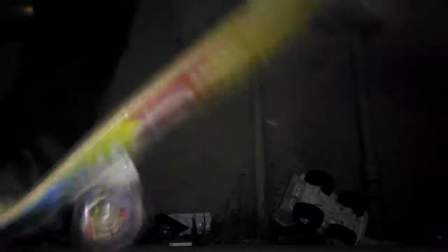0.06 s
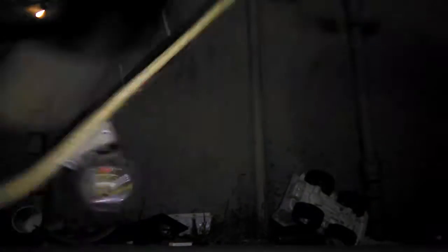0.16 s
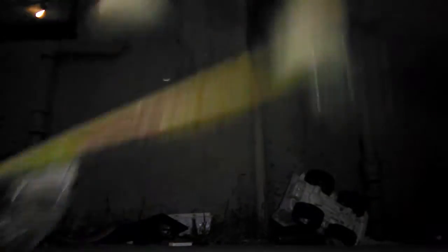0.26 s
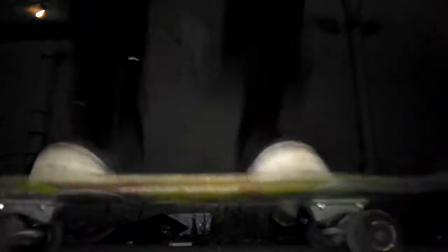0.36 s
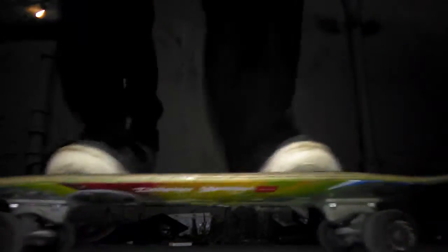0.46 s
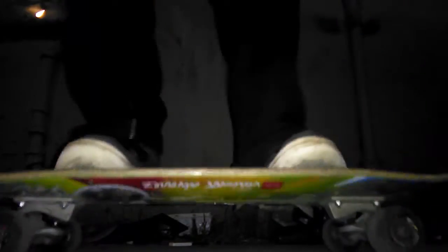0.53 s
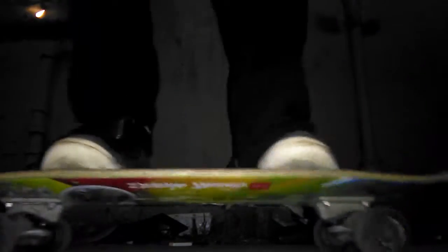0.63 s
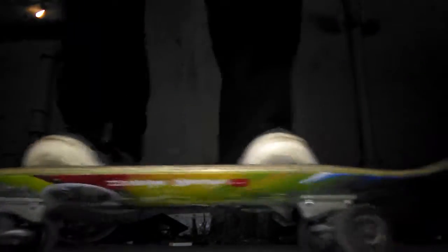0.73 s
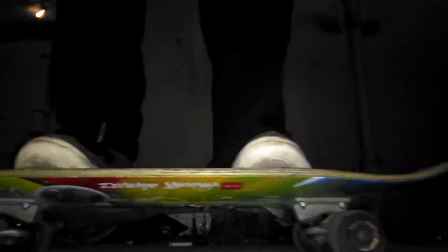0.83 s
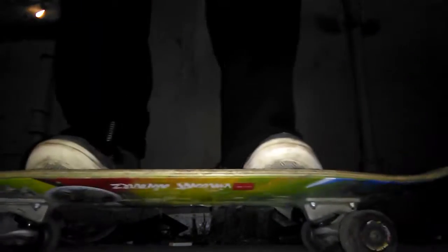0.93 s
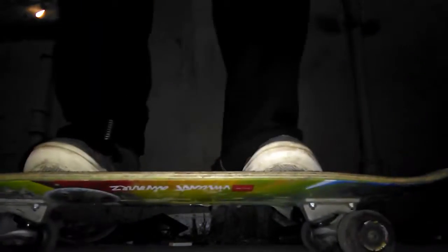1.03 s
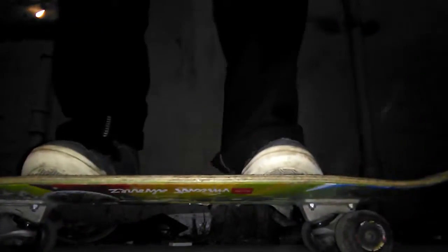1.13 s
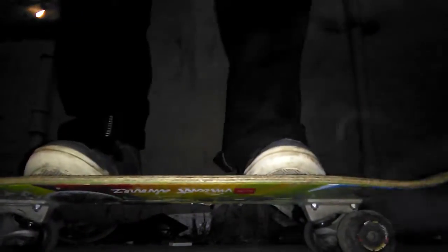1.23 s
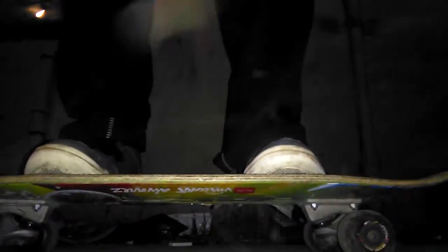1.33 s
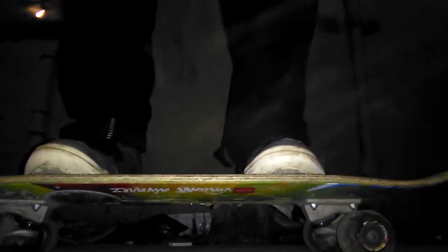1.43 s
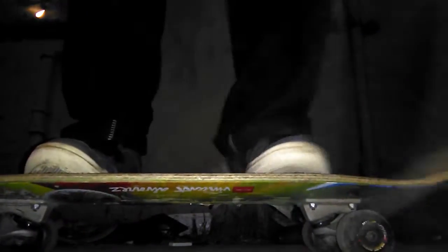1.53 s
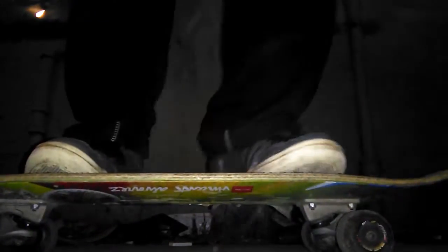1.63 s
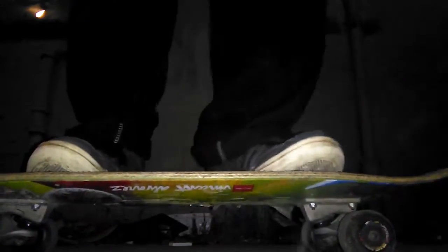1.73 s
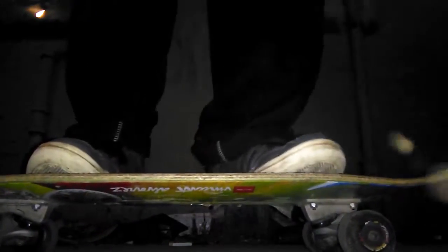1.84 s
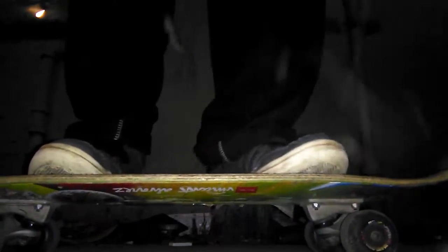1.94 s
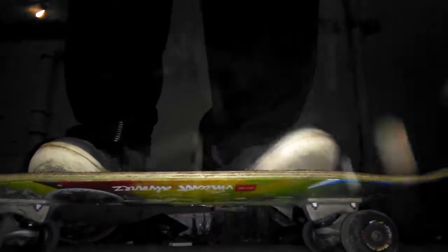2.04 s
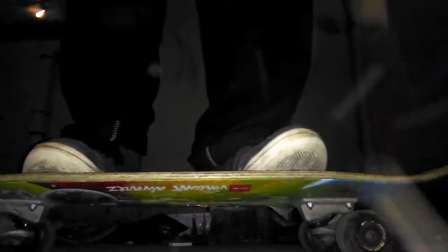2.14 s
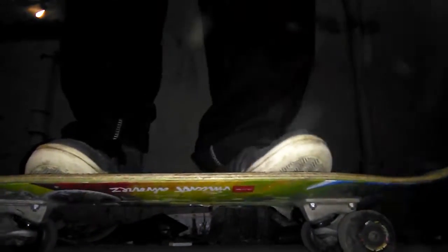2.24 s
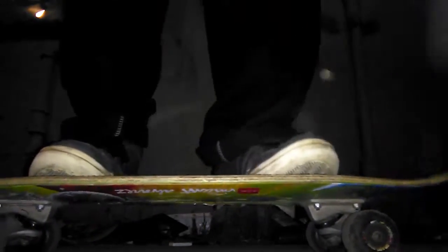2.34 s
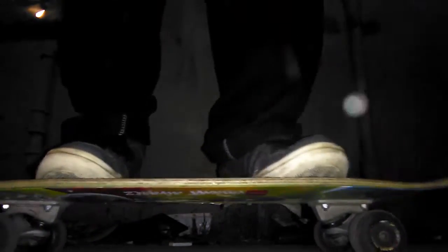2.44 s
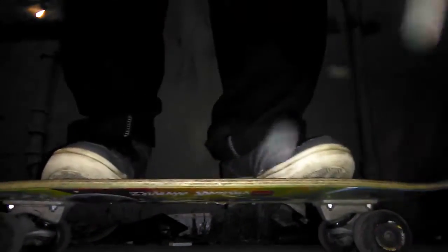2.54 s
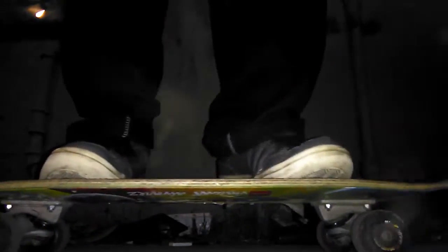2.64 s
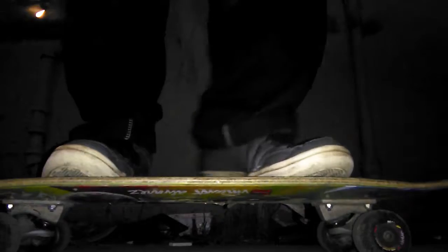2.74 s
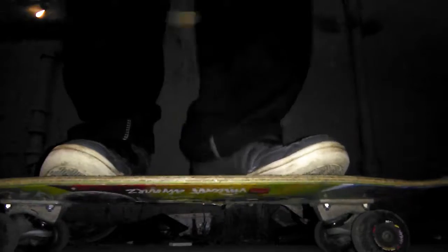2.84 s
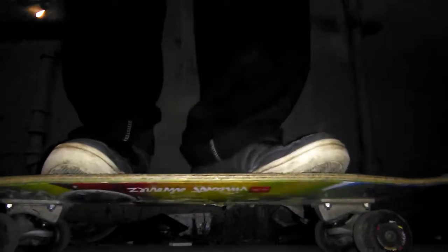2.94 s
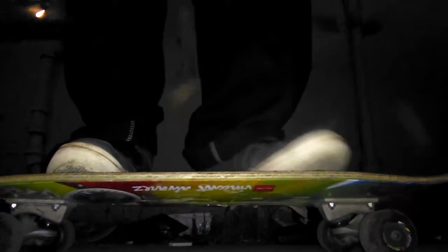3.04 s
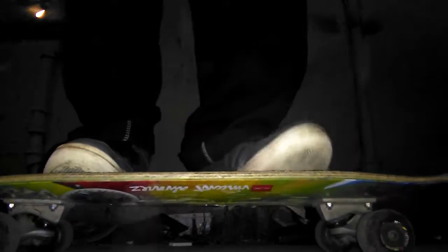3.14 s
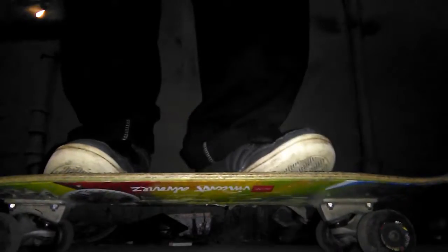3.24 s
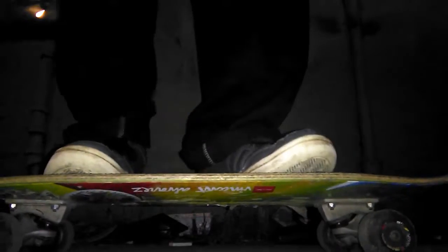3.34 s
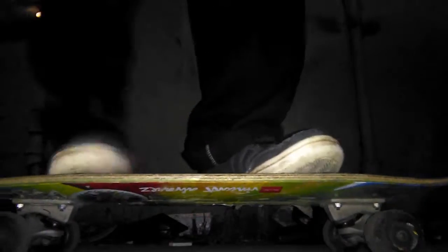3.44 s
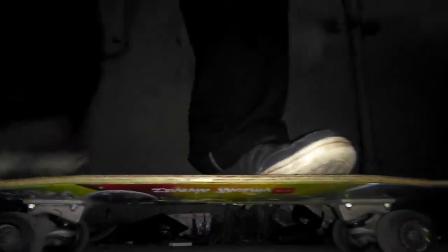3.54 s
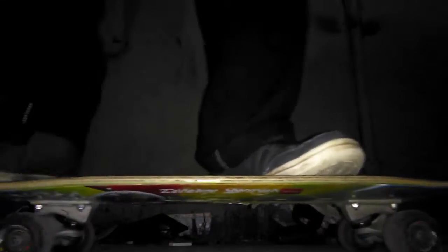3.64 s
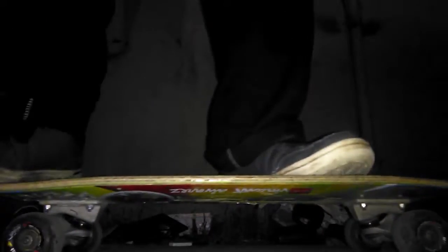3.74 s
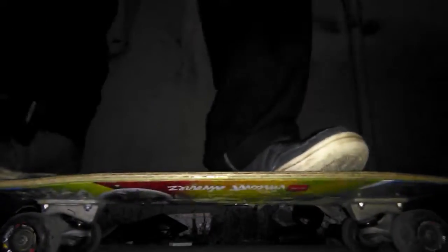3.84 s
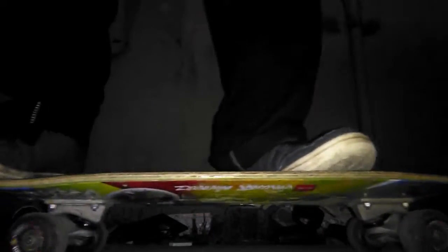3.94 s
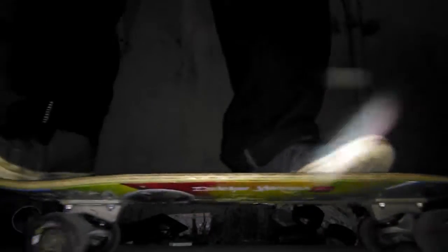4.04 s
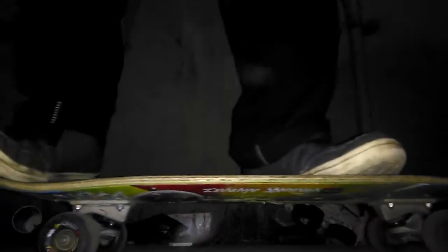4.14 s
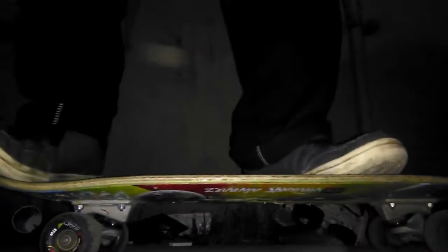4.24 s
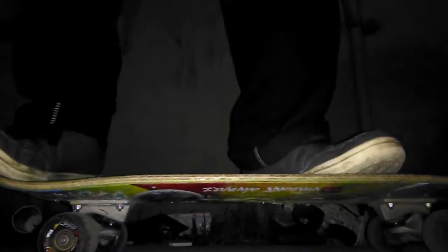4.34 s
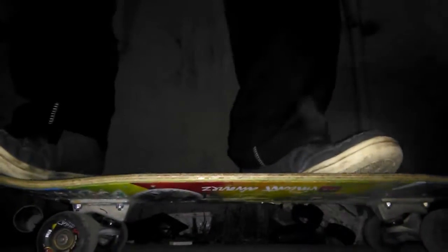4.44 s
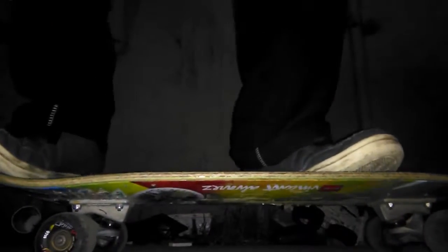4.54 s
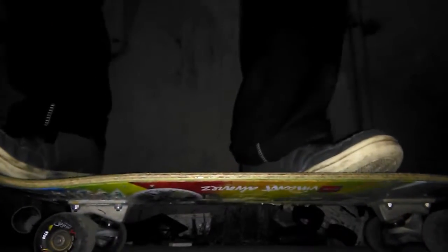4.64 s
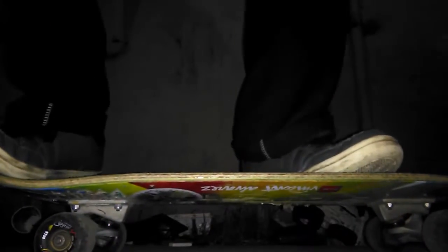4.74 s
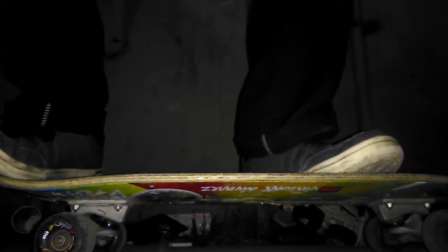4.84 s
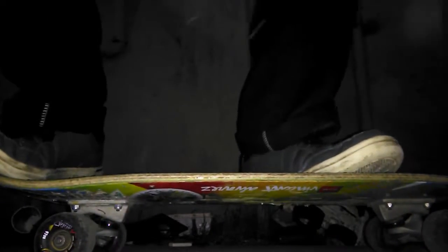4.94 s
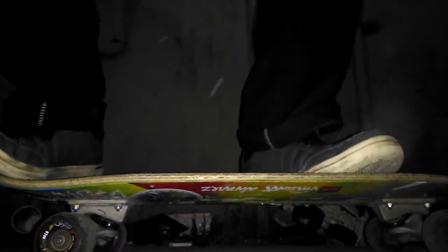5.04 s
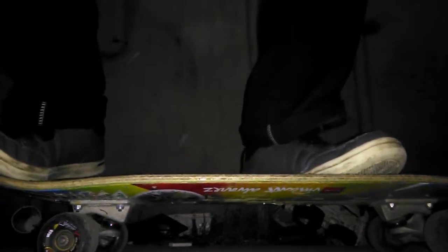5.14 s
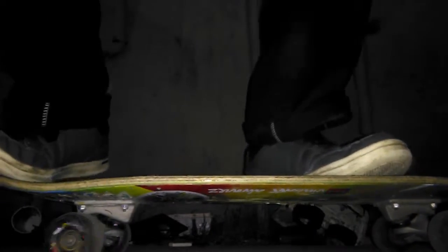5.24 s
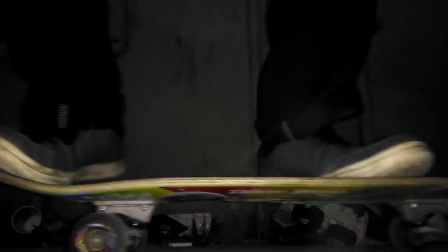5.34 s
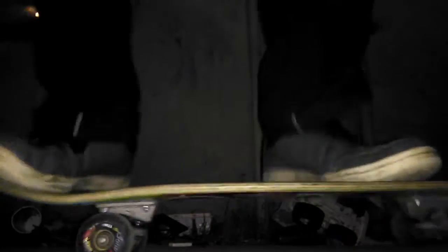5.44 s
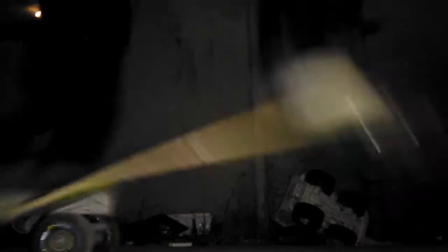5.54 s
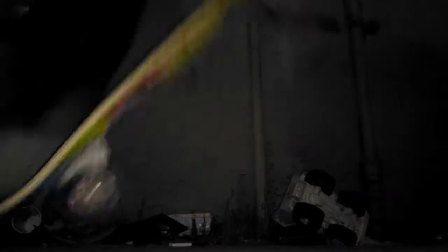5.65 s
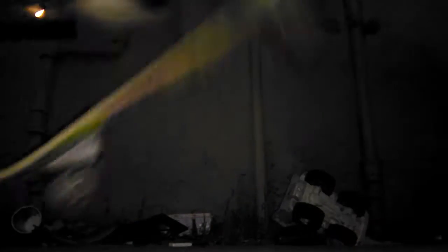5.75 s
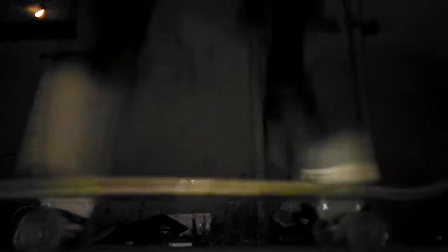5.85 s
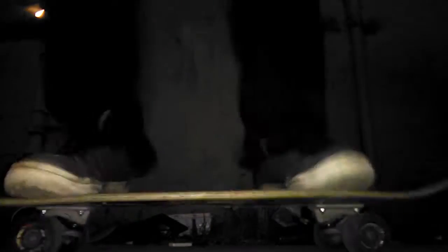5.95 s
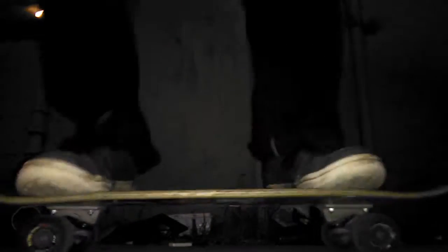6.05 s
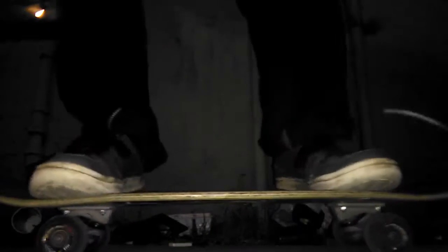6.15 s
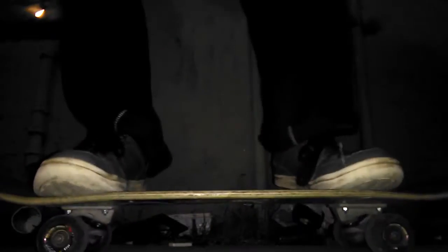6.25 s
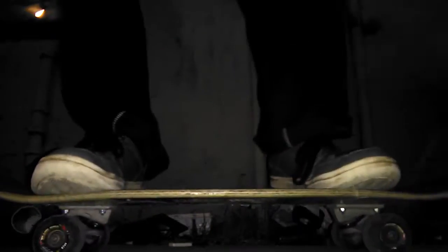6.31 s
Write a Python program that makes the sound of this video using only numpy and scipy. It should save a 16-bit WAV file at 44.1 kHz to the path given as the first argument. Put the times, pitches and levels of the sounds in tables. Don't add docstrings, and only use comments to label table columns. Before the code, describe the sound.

Very close to a skateboard in a small bare room: the tail snaps hard, wheels slam down a quarter second later, plywood ringing and trucks rattling, with a few bounces. Then quiet shoe scuffs, brief rubber squeaks and metal ticks over dull ventilation rumble. Near the end a second snap and landing hit, distorting the microphone.

```python
import sys
import numpy as np
from scipy import signal
from scipy.fft import rfft, irfft, next_fast_len
from scipy.io import wavfile
from scipy.ndimage import uniform_filter1d, minimum_filter1d, map_coordinates

SR = 44100
rng = np.random.default_rng(int(sys.argv[2]) if len(sys.argv) > 2 else 0)


def unload_wav(signal):
    wavfile.write(
        sys.argv[1],
        SR,
        np.round(np.clip(np.atleast_2d(signal).T, -1, 1) * 32767).astype(np.int16),
    )


def gain_from_db(level_db):
    decades = np.asarray(level_db, float) / 20
    return 10 ** decades


N = 281358

# (frequency [Hz], time to fade by 60 dB [s])
ROOM_FADE = [(60, 0.37), (250, 0.37), (600, 0.41), (2000, 0.33), (10000, 0.28)]
# (frequency [Hz], likeness [0 to 1])
LEFT_RIGHT_LIKENESS = [(60, 0.82), (290, 0.83), (640, 0.42), (1300, .0), (3100, 0.064), (15000, 0.15)]

# (frequency [Hz], level [dB])
DUCT_COLOUR = [(88, -29), (150, -1), (427, -4), (736, -2), (811, 1), (965, 0), (1240, -15.5), (1870, -19),
               (3610, -38), (5020, -38), (5530, -34), (8310, -35.5), (13200, -40.5), (14300, -49),
               (15400, -68.5)]
# (frequency [Hz], level [dB])
RUMBLE_COLOUR = [(12, -56.5), (20, -28.5), (46, -5), (65, 3), (162, -4), (232, -7), (250, -5.5), (320, -23),
                 (550, -120)]
# (time [s], level [dB])
ROCKING_LEVEL = [
    (0, -46.5),
    (1, -53),
    (2, -54),
    (3, -49),
    (4, -49),
    (4.8, -55),
    (5.6, -49),
    (6.1, -39.5),
    (6.38, -56),
]

# (full strength from [s], hold [s], scuff level [dB], fine hiss level [dB])
FOOT_DRAGS = [(.04, 0.0022, -30, -37), (.08, 0.06, -45.5, -42), (.19, 0.024, -29, -28.5),
              (.266, 0.0056, -39, -40), (.3, 0.12, -53, -53), (.48, 0.053, -33.5, -38.5),
              (.575, 0.011, -33, -28.5), (.62, 0.039, -39.5, -55), (.71, 0.04, -36, -59),
              (.78, 0.052, -41.5, -54), (.88, 0.0026, -56, -67), (.93, 0.057, -70, -69),
              (5.475, 0.088, -31.5, -40), (5.54, 0.048, -35.5, -38), (5.62, 0.09, -45, -46),
              (5.72, 0.045, -32, -29), (5.848, 0.0023, -41, -48), (5.88, 0.048, -57, -57),
              (6.05, 0.044, -40, -41.5), (6.14, 0.033, -45.5, -47), (6.208, 0.045, -47.5, -57),
              (6.37, 0.017, -55, -59)]
# (full strength from [s], hold [s], scuff level [dB], fine hiss level [dB])
FOOT_SHUFFLES = [(1.13, .12, -41, -51), (1.58, 0.11, -45.5, -51.5), (1.8, 0.053, -60, -69),
                 (1.95, 0.029, -51, -66), (2.12, 0.013, -42.5, -48), (2.24, .01, -71, -64.5),
                 (2.38, 0.19, -46, -58), (2.77, 0.081, -43, -46.5), (2.99, 0.0025, -51, -58),
                 (3.14, 0.005, -38.5, -46.5), (3.45, 0.037, -54, -61.5), (3.54, 0.022, -57.5, -53),
                 (3.665, 0.044, -54, -54.5), (3.79, 0.0046, -52, -61), (3.9, 0.0075, -49.5, -61),
                 (4.05, 0.048, -77, -66), (4.135, 0.071, -45.5, -55), (4.26, .01, -59, -61),
                 (4.45, 0.17, -66.5, -71), (4.61, 0.0075, -49.5, -60), (4.7, .47, -82.5, -64.5),
                 (5.2, .11, -50, -67), (5.34, 0.099, -50.5, -63)]
# (frequency [Hz], width [Hz], level [dB])
SOLE_RESONANCES = [(1835, 370, -1.5), (2330, 410, 1), (3600, 1800, -1), (4710, 1100, 1.1), (5540, 500, 0.4)]
# (frequency [Hz], level [dB])
GRIT_COLOUR = [(4000, -26), (6500, 0), (8300, 1.5), (10000, -4.5), (12000, -13), (14000, -21.5),
               (15800, -50)]

# (time [s], click level [dB], knock level [dB], thud level [dB], thud pitch [Hz])
LIGHT_KNOCKS = [(0.0374, -23, -27.5, -29, 519), (0.0466, -42, -30.5, -29, 490),
                (0.123, -26, -22.5, -29, 306), (.357, -46, -56, -30, 443), (0.67, -23, -33, -27, 200),
                (0.6759, -11, -19.5, -14, 178), (0.688, -28, -15, -21, 153), (0.6967, -5, -16, -18, 263),
                (0.7033, -37, -24.5, -14.5, 633), (0.8291, -28, -43.5, -35, 276),
                (.846, -19, -22, -26.5, 318), (0.8603, -21, -22, -17.5, 178),
                (3.6365, -36, -24, -25.5, 373), (3.65, -36, -36, -34.5, 327), (3.695, -47, -38.5, -48, 147),
                (3.9417, -21, -27.5, -29, 532), (5.5108, -18, -31, -37, 486),
                (5.5192, -26, -26.5, -30, 480), (5.5686, -42, -29, -28.5, 540), (5.577, -39, -35, -25, 543),
                (5.5885, -40, -25.5, -22, 550), (5.912, -32, -42, -53, 298),
                (6.2074, -24.5, -29.5, -45, 142)]
# (frequency [Hz], level [dB])
CLICK_COLOUR = [(3500, -23.5), (6000, -0.5), (8000, 0.5), (10000, -6), (12000, -22.5), (14500, -28.5),
                (15800, -55.5)]

# (time [s], blow level [dB], rattle level [dB], loudest deck region [Hz])
TAIL_SNAPS = [
    (.13, -1, -16.5, 677),
    (5.677, -2.5, -25, 550),
]
# (time [s], blow level [dB], rattle level [dB], loudest deck region [Hz])
WHEEL_LANDINGS = [
    (0.3844, 0.5, -9.5, 680),
    (5.9195, 1, -5.5, 513),
]
# (frequency [Hz], level [dB])
SNAP_COLOUR = [(18, -36.5), (30, -8.5), (71, -5.5), (133, -10.5), (545, -5.5), (919, -4), (1400, -6),
               (1590, -2.5), (3310, -13.5), (3970, -18), (9650, -25), (13200, -37), (15400, -50.5)]
# (frequency [Hz], level [dB])
SLAM_COLOUR = [(18, -54.5), (30, -32.5), (156, -2.5), (207, -12.5), (269, -1), (315, -5), (398, -7),
               (431, -11.5), (545, -3), (828, -8.5), (2070, -12), (3220, -25), (8250, -31), (12900, -54.5),
               (15400, -84.5)]
# (frequency [Hz], level [dB])
RATTLE_COLOUR = [(300, -31.5), (1500, -1), (3000, -5), (6000, -12.5), (8500, -7.5), (11000, -15),
                 (14500, -21.5), (15800, -64.5)]
# (pitch [Hz], level [dB], time to fade by 60 dB [s])
DECK_MODES = [(154.2, 1.5, 0.38), (194.2, 1, 0.44), (272.4, -3, 0.23), (325.3, -5.5, 0.49), (386, -1, 0.2),
              (486, -2.5, 0.39), (526.4, 3, 0.16), (556, -8, 0.25), (563, -1.5, 0.28), (644, -0.5, 0.32),
              (700, 1, 0.38), (928, -10, 0.3)]

# (time [s], peak level [dB], pitch [Hz])
TRUCK_TICKS = [(0.2658, -23.5, 6800), (0.5701, -20.5, 6030), (0.611, -22.5, 8300), (0.766, -32, 7800),
               (0.92, -43, 7750), (0.9283, -38, 7600), (0.9797, -39, 8050), (1.2755, -36, 4310),
               (1.5675, -50, 5640), (1.5853, -43, 5540), (1.6151, -25.5, 4840), (1.6903, -31, 5000),
               (1.8098, -49, 5730), (2.1644, -47, 6100), (2.193, -45, 4840), (2.237, -35, 4200),
               (2.2494, -43, 4180), (2.5764, -36, 4340), (2.7614, -33, 5040), (2.7736, -45, 4840),
               (2.931, -39, 4980), (3.15, -40, 4930), (3.5614, -43, 9330), (3.9076, -38, 4200),
               (5.3756, -35, 5360), (5.4046, -30, 8400), (5.8407, -29, 7500), (6.115, -22.5, 6000),
               (6.1639, -37, 8700)]

# (time [s], slips per second [Hz], level [dB])
SQUEAK_GLIDES = [
    [(1.07, 590, -67), (1.092, 540, -66), (1.12, 690, -60), (1.14, 820, -53), (1.155, 900, -47),
     (1.17, 962, -48), (1.192, 975, -50)],
    [(3.885, 1754, -52), (3.895, 1580, -50), (3.907, 1361, -54), (3.92, 1062, -53)],
    [(4.13, 970, -54), (4.146, 1115, -45), (4.16, 1185, -48), (4.172, 1250, -53), (4.188, 1118, -49),
     (4.205, 1109, -48)],
    [(5.45, 620, -52), (5.468, 780, -44), (5.482, 940, -40), (5.5, 1070, -35), (5.512, 1050, -37)],
]
# (frequency [Hz], width [Hz], level [dB])
RUBBER_RESONANCES = [(2200, 600, 0), (2900, 500, 0), (3550, 500, 1), (4600, 500, -8), (5650, 450, 5),
                     (7600, 900, -11)]


def unit(x):
    return x / np.sqrt(np.mean(x ** 2) + 1e-20)


def along(points, hz):
    f, v = np.transpose(points)
    return np.interp(np.log(hz + 1), np.log(f + 1), v)


def curves(rows):
    s, *cols = np.transpose(rows)
    return [np.interp(np.arange(N) / SR, s, c) for c in cols]


def wobble(rate):
    knots = rng.standard_normal(int(N * rate / SR) + 4)
    return map_coordinates(knots, [np.arange(N) * rate / SR])


def filtered(x, response):
    size = next_fast_len(x.shape[-1] + 8192)
    spectrum = rfft(x, size) * response(np.fft.rfftfreq(size, 1 / SR))
    return irfft(spectrum, size)[..., :x.shape[-1]]


def resonant(modes):
    def response(f):
        total = 0
        for k, (centre, width, db) in enumerate(modes):
            damping = 1j * f * width
            total = total + (-1) ** k * gain_from_db(db) * damping / (centre ** 2 - f ** 2 + damping)
        return total
    return response


def around(hz, skirt_db):
    return [(hz / 3.5, 3 * skirt_db), (hz / 1.7, skirt_db), (hz, 0),
            (hz * 1.5, skirt_db), (hz * 3, 3 * skirt_db), (hz * 8, 6 * skirt_db)]


def diffuse(spectrum, size):
    def shape(hz):
        turn = np.arccos(np.clip(along(LEFT_RIGHT_LIKENESS, hz), -1, 1)) / 2
        return gain_from_db(along(spectrum, hz)) * np.array([np.cos(turn), np.sin(turn)])
    mid, side = filtered(rng.standard_normal((2, size)), shape)
    return unit(np.array([mid + side, mid - side]))


def patchy(x, depth_db, bins, frames):
    z = signal.stft(x, nperseg=256)[2]
    field = uniform_filter1d(rng.standard_normal(z.shape[-2:]), bins, axis=0)
    field = uniform_filter1d(field, frames, axis=1)
    uneven = signal.istft(z * gain_from_db(depth_db * unit(field)), nperseg=256)[1]
    return unit(uneven[..., :x.shape[-1]])


def dying(noise, factor):
    hz, t, z = signal.stft(noise, SR, nperseg=512)
    fade_s = factor * along(ROOM_FADE, hz)[:, None]
    return signal.istft(z * gain_from_db(-60 * t / fade_s), SR, nperseg=512)[1][:, :noise.shape[1]]


def add(track, s, sound):
    part = track[..., round(s * SR):][..., :sound.shape[-1]]
    part += sound[..., :part.shape[-1]]


def air():
    t = np.arange(N) / SR
    boom = 0
    for s, db, *_ in TAIL_SNAPS + WHEEL_LANDINGS:
        boom = boom + (t > s) * gain_from_db(db - 34 - 60 * np.abs(t - s) / 1.7)
    roar = np.hypot(gain_from_db(-46), boom)
    gusts = gain_from_db(.7 * wobble(8) + 1.5 * wobble(30))
    duct = roar * gusts * patchy(diffuse(DUCT_COLOUR, N), depth_db=1.5, bins=2, frames=30)
    rumble_db, = curves(ROCKING_LEVEL)
    return duct + gain_from_db(rumble_db + 1.5 + 0.94 * wobble(17)) * diffuse(RUMBLE_COLOUR, N)


def strokes(table, rise, fall):
    s, hold_s, *levels_db = np.transpose(table)[:, :, None]
    t = np.arange(0, N + SR, 40) / SR
    shape_db = -rise * np.maximum(s - t, 0) - fall * np.maximum(t - s - hold_s, 0)
    powers = [gain_from_db(2 * (shape_db + db)).sum(axis=0) for db in levels_db]
    return np.array([np.interp(np.arange(N) / SR, t, power) for power in powers])


def gliding(rows, fade_s):
    t = np.arange(N) / SR
    return np.clip(np.minimum(t - rows[0][0], rows[-1][0] - t) / fade_s, 0, 1)


def scuffs():
    shuffling = strokes(FOOT_SHUFFLES, rise=450, fall=316)
    dragging = strokes(FOOT_DRAGS, rise=540, fall=840)
    scuff, hiss = np.sqrt(shuffling + dragging)
    gripping = sum(gliding(rows, 0.024) for rows in SQUEAK_GLIDES)
    scuff = scuff * gain_from_db(-10 * gripping)
    hiss = hiss * gain_from_db(-4 * gripping)
    roughness_db = 1.5 * rng.standard_exponential((1, N)) + 1.5 * wobble(90)
    grains = rng.standard_normal((2, N)) * gain_from_db(roughness_db)
    grains = patchy(grains, depth_db=3.0, bins=3, frames=6)
    body = unit(filtered(grains, resonant(SOLE_RESONANCES)))
    fine = unit(filtered(grains, lambda hz: gain_from_db(along(GRIT_COLOUR, hz))))
    return gain_from_db(-0.14) * scuff * body + gain_from_db(-1.4) * hiss * fine


def deck(t, loudest_hz):
    ring = 0
    for hz, db, fade_s in DECK_MODES:
        waver = np.cumsum(uniform_filter1d(rng.standard_normal(len(t)), size=900)) * 0.023
        favour_db = -10 * abs(np.log2(hz / loudest_hz))
        favour_db = favour_db + 4 * unit(uniform_filter1d(rng.standard_normal(len(t)), size=1300))
        level = gain_from_db(db + favour_db - 60 * t / min(fade_s, .38))
        ring = ring + level * np.sin(2 * np.pi * (hz * t + rng.random()) + waver)
    return ring


def knocks():
    out, t = np.zeros((2, N)), np.arange(SR // 10) / SR
    onset = (1 + 0.72 * gain_from_db(-60 * t / 0.0056)) * (1 - np.exp(-t / 0.00055))
    for s, click_db, knock_db, thud_db, thud_hz in LIGHT_KNOCKS:
        click = gain_from_db(click_db - 6.5 - 60 * t / 0.015) * diffuse(CLICK_COLOUR, len(t))
        knock = gain_from_db(knock_db - 60 * t / 0.043) * diffuse(around(1550, skirt_db=-5.5), len(t))
        sagging = np.sin(2 * np.pi * thud_hz * t * (1 - 4 * t))
        thud = gain_from_db(thud_db + 7.5 - 60 * t / 0.025) * sagging
        ring = gain_from_db(knock_db - 9 - 60 * t / 0.053) * deck(t, loudest_hz=710)
        add(out, s, (click + knock + thud + ring) * onset)
    return out


def room(x):
    tail = dying(diffuse([(20, 0.011), (16000, 0.0004)], SR // 2), 0.87)
    delayed = np.pad(x, ((0, 0), (300, 0)))
    return signal.fftconvolve(delayed, tail / np.linalg.norm(tail[0]), axes=1)[:, :N]


def blows(table, colour, drive_db, ring_db):
    out, t = np.zeros((2, N)), np.arange(SR * 3 // 4) / SR
    for s, db, rattle_db, loudest_hz in table:
        jolts = np.repeat(rng.standard_normal(len(t)), 60)[:len(t)]
        shaking = gain_from_db(-60 * np.maximum(t - 0.042, 0) / 0.1 + 2.2 * jolts)
        crack = 2.1 * gain_from_db(-60 * t / 0.042)
        burst = dying(patchy(diffuse(colour, len(t)), depth_db=0.5, bins=2, frames=6), .98)
        ring = gain_from_db(ring_db) * deck(t, loudest_hz)
        loose = patchy(diffuse(RATTLE_COLOUR, len(t)), depth_db=-1.0, bins=5, frames=2)
        sound = burst + ring + gain_from_db(rattle_db) * (shaking + crack) * loose
        add(out, s, gain_from_db(db + drive_db) * sound * (1 - np.exp(-t / .0004)))
    return out


def ticks():
    out, t = np.zeros((2, N)), np.arange(SR // 20) / SR
    for s, db, hz in TRUCK_TICKS:
        add(out, s, gain_from_db(db - 3.5 - 60 * t / 0.018) * diffuse(around(hz, skirt_db=-11.0), len(t)))
    return out


def squeaks():
    out = np.zeros(N)
    unsteady = 1 + .011 * wobble(200)
    overtones = {k: gain_from_db(2.5 * wobble(50)) for k in range(2, 14)}
    for rows in SQUEAK_GLIDES:
        rate_hz, db = curves(rows)
        gain = gain_from_db(db) * gliding(rows, 0.012)
        on = gain > 0
        phase = 2 * np.pi * np.cumsum((rate_hz * unsteady)[on]) / SR
        out[on] += gain[on] * sum(size[on] * np.cos(k * phase) for k, size in overtones.items())
    out = filtered(out, resonant(RUBBER_RESONANCES))
    return np.array([out, gain_from_db(1) * np.roll(out, 1)])


def scene():
    small = knocks() + ticks()
    snaps = blows(TAIL_SNAPS, SNAP_COLOUR, drive_db=-3.0, ring_db=-15.0)
    landings = blows(WHEEL_LANDINGS, SLAM_COLOUR, drive_db=7, ring_db=-6.0)
    rubber = squeaks()
    echo = room(gain_from_db(-8.5) * small + gain_from_db(-11) * rubber)
    return air() + scuffs() + small + snaps + landings + rubber + echo


def low_pass(x):
    return signal.sosfilt(signal.butter(12, 15600, fs=SR, output="sos"), x)


def record(dry):
    peak = np.abs(dry).max(axis=0)
    need = np.minimum(1, 1.5 / (peak + 1e-9))
    need = minimum_filter1d(need, size=600, origin=230)
    held = dry * uniform_filter1d(need, size=100)
    clipped = held / (1 + np.abs(held / .96) ** 4) ** (1 / 4)

    def microphone(hz):
        treble_db = -30 * np.clip((hz - 14100) / 1200, 0, 2)
        bass_db = -9 * np.clip((45 - hz) / 20, 0, 2)
        return gain_from_db(treble_db + bass_db)
    return low_pass(filtered(clipped, microphone))


dry = scene()
out = record(dry)
unload_wav(out)
```